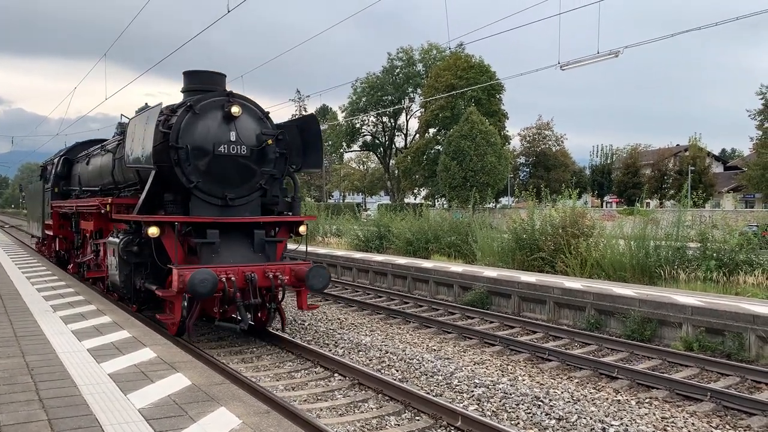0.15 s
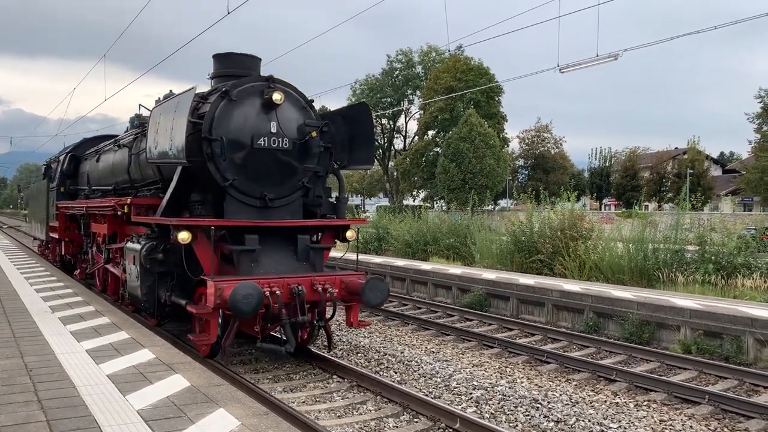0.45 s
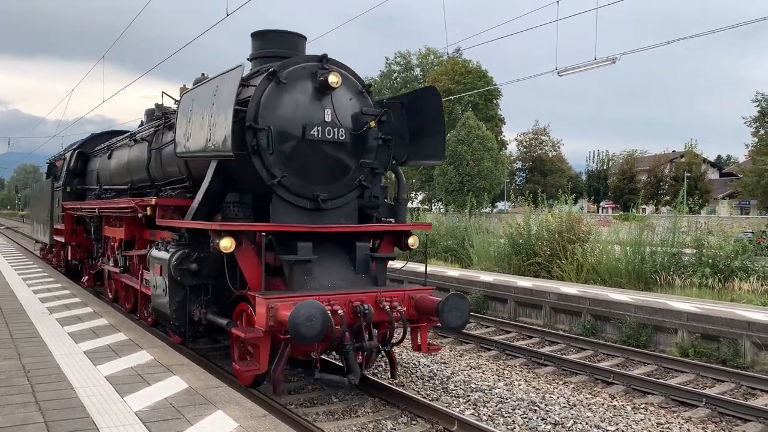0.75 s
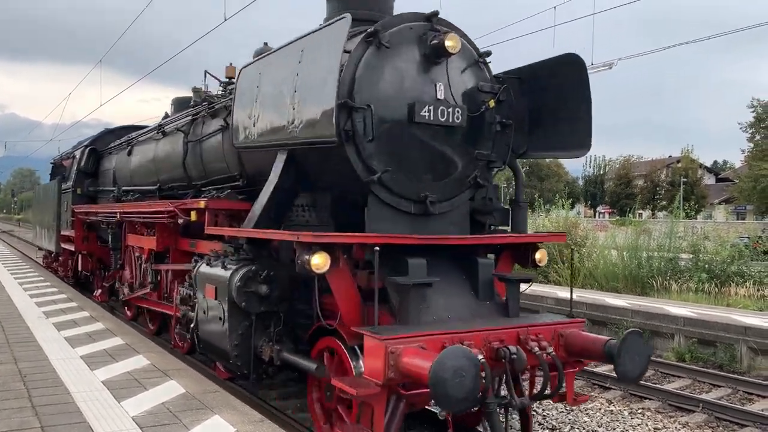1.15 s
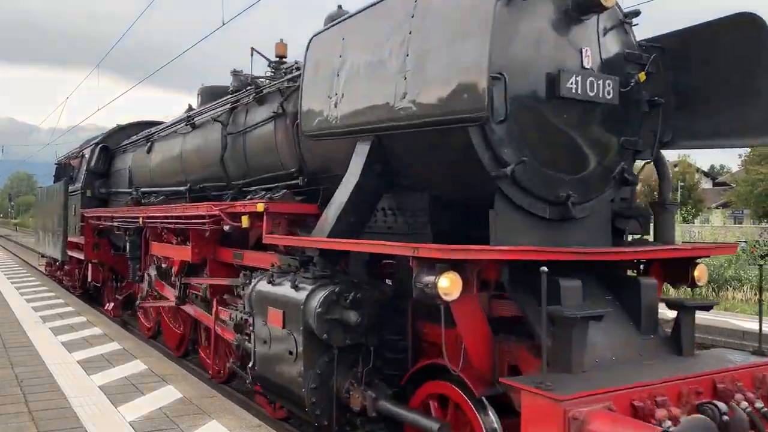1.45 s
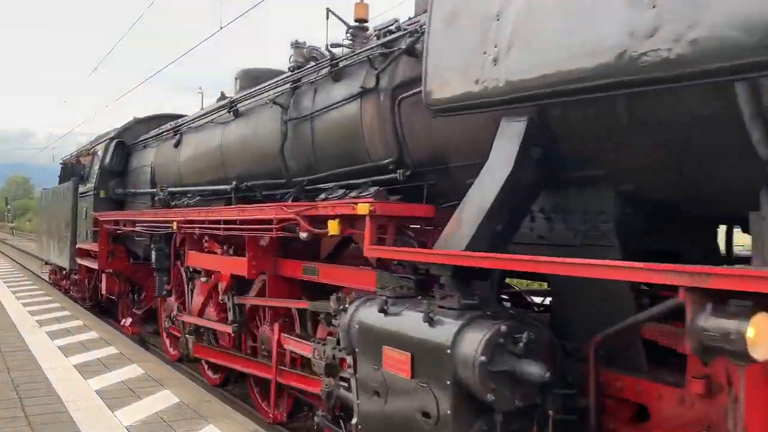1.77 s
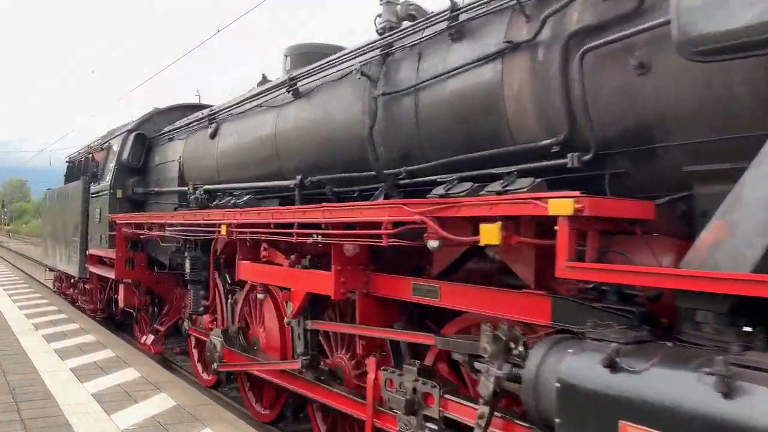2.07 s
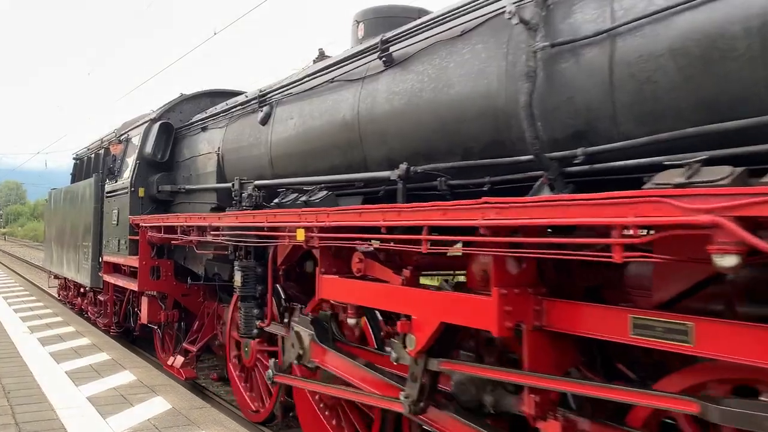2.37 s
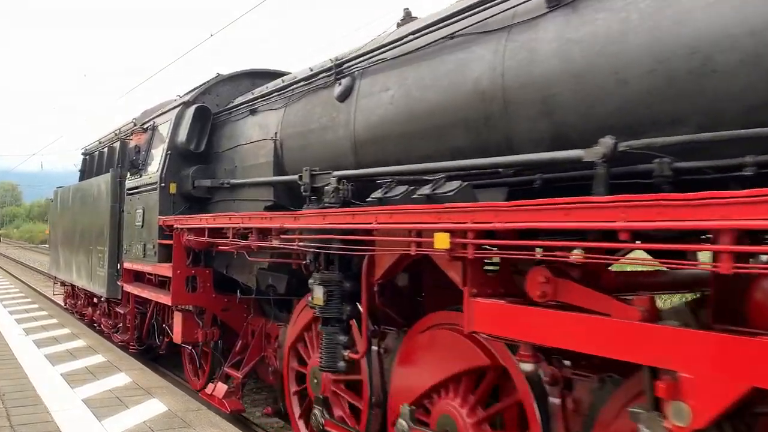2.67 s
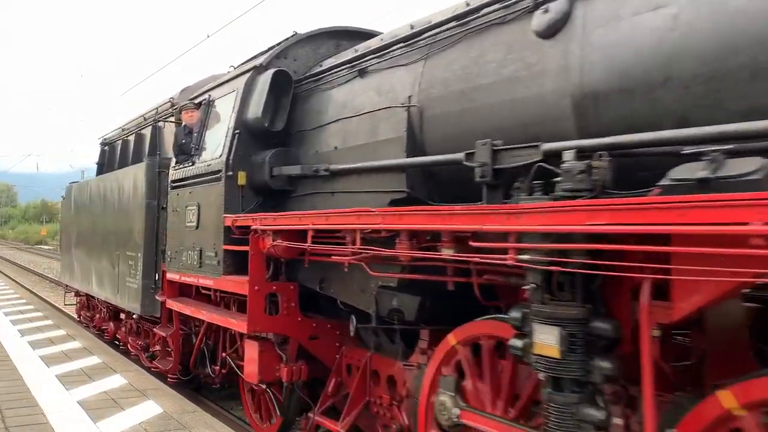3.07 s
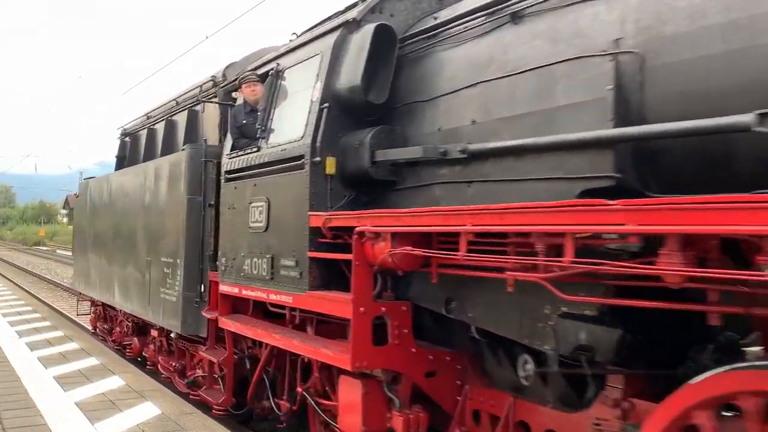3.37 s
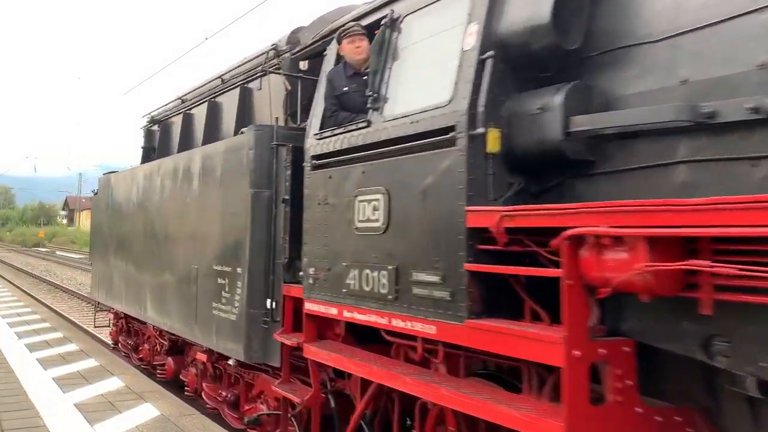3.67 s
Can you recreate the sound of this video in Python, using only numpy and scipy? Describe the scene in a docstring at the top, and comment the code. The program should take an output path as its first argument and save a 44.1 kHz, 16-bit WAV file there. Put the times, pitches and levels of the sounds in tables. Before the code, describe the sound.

A coasting steam locomotive approaches and rolls past close stereo microphones on an open station platform; bass boom peaks midway, steel clanks and rattles sharpen, then the boom fades while wheel ring and steam rush continue.

```python
"""A deep rumble and a hollow boom swell as a steam locomotive coasts past a station platform.
Bulk, rolling roar and steam are shaped noise; low throbs are short sine swells in the bass.
The coupling rods knock with a chattering crack, a short body and a ring of decaying steel modes.
Dull clanks, random rattles and small pitched clinks come from the running gear and loose fittings.
Two close microphones hear it with moving time lags and with sound scattered to both sides."""
import sys
import numpy as np
from scipy import signal
from scipy.fft import rfft, irfft, next_fast_len
from scipy.io import wavfile
from scipy.ndimage import uniform_filter1d, map_coordinates

SR = 44100
rng = np.random.default_rng(int(sys.argv[2]) if len(sys.argv) > 2 else 0)


def log_audio(samples):
    """Write samples as a 16-bit WAV file to the path given in sys.argv[1]."""
    # one column per channel
    frames = np.atleast_2d(samples).T
    # limit to full scale, then quantise
    limited = np.clip(frames, -1, 1)
    pcm = np.round(limited * 32767).astype(np.int16)
    wavfile.write(sys.argv[1], SR, pcm)


N = 168462  # samples, about 3.82 s

# Loudness of the bulk: deep rumble, thrum above it, hollow boom and frame drone.
# Each row: time in seconds, level in dB.
RUMBLE_LEVEL = [(0, -34), (.7, -31.5), (1.05, -22), (1.35, -29.5), (1.9, -25), (2.3, -24.5), (2.9, -26.5),
                (3.3, -27.5), (3.82, -29)]
THRUM_LEVEL = [(0, -22.5), (.4, -23.5), (1.1, -26), (1.6, -25.5), (1.9, -20.5), (2.2, -19.5), (2.8, -27),
               (3.82, -29)]
BOOM_LEVEL = [(0, -31.5), (.3, -27), (.7, -31), (1.05, -26.5), (1.35, -20), (1.65, -17), (2.12, -15),
              (2.45, -19.5), (2.72, -16.5), (3.05, -22.5), (3.82, -31)]
DRONE_LEVEL = [(0, -35), (.25, -28.5), (1.1, -27.5), (1.9, -24.5), (2.45, -24.5), (2.8, -23.5), (3.1, -25),
               (3.4, -28.5), (3.82, -26.5)]
# Loudness of the narrow hum. Each row: time in seconds, level in dB before a fixed trim.
HUM_LEVEL = [(0, -34.5), (.55, -34.5), (1.0, -31.5), (1.9, -38.5), (2.4, -22.5), (2.7, -38), (2.95, -26),
             (3.2, -40.5), (3.82, -36.5)]
# Tone of the bulk layers. Each row: frequency in Hz, relative density in dB per Hz.
RUMBLE_SPECTRUM = [(15, -55), (24, -30), (32, -18), (42, -4), (54, 2.5), (64, 7.5), (78, 3), (100, 1),
                   (150, -38)]
THRUM_SPECTRUM = [(25, -65), (50, -17), (72, -9), (92, 1), (115, 0.5), (135, -1.5), (160, -14.5),
                  (220, -31), (500, -64)]
BOOM_SPECTRUM = [(40, -65), (100, -22), (125, -9.5), (142, -0.5), (160, 1), (178, -2), (200, -9),
                 (260, -20.5), (400, -78), (800, -75)]
DRONE_SPECTRUM = [(40, -60), (150, -16), (205, -0.5), (240, 0), (275, 2), (305, -2.5), (345, -3.5),
                  (410, -11.5), (480, -37), (600, -29), (1500, -75)]
# The boom bends as the cylinders go by; only the ratio to the mean pitch counts.
# Each row: time in seconds, pitch in Hz.
BOOM_PITCH = [(0, 152), (1.6, 160), (2.0, 145), (2.3, 140), (2.65, 155), (3.82, 160)]
HUM_HZ, HUM_HALF_WIDTH_HZ = 222.7, 6.1
# Heavy throbs of the engine's mass. Each row: time of the crest in seconds, level in dB, pitch in Hz.
THROBS = [(0.055, -22, 138), (.101, -21.5, 86), (.302, -18, 105), (.533, -22.5, 144), (.646, -21, 118),
          (1.088, -16.5, 121), (1.19, -17, 81), (1.291, -15, 156), (1.533, -12.5, 149), (1.663, -13, 165),
          (1.877, -18, 227), (1.987, -24, 85), (2.194, -13, 146.6), (2.318, -15, 131), (2.5, -15.5, 145),
          (2.611, -16.5, 155), (2.943, -17.5, 73), (3.071, -17, 148), (3.196, -24, 156), (3.371, -23, 253),
          (3.565, -23.5, 160)]
THROB_RISE_S, THROB_FALL_S = 0.011, 0.016  # Gaussian spreads

# Rolling roar, which also sets the rattles and clinks. Each row: time in seconds, level in dB.
ROLL_LEVEL = [(0, -30.5), (.42, -29.5), (.56, -25.5), (.7, -27.5), (.9, -29.5), (1.15, -26), (1.45, -25.5),
              (1.63, -22.5), (1.82, -26.5), (2.05, -23.5), (2.35, -25), (2.6, -22.5), (2.95, -23),
              (3.13, -27.5), (3.3, -23.5), (3.5, -26.5), (3.82, -25.5)]
# Tone of the rolling roar. Each row: frequency in Hz, relative density in dB per Hz.
ROLL_SPECTRUM = [(30, -45), (200, -6), (380, -3), (470, -7), (550, 0.5), (650, 0.5), (800, 2), (950, -2.5),
                 (1100, -6), (1400, -5), (1900, -9), (2600, -12), (4000, -14), (8000, -55)]
# Loudness of the ringing wheels. Each row: time in seconds, level in dB before its wobble.
RING_LEVEL = [(0, -64), (1.0, -49), (1.7, -42), (2.3, -30.5), (2.9, -29), (3.3, -33), (3.82, -32)]
# Resonances of the wheels. Each row: frequency in Hz, width at half amplitude in Hz, relative level in dB.
WHEEL_MODES = [(445, 70, 2), (1049, 60, 0), (651, 30, 1), (1145, 50, -1), (1590, 90, -7), (1780, 90, -3),
               (1975, 70, -4), (3102, 35, -9), (3360, 60, -12), (3575, 40, -11), (3747, 35, -9),
               (4021, 24, -4), (4650, 400, -13), (7466, 120, -10)]
RING_PATCHY_DB = 3.5
RATTLES_PER_S, RATTLE_DB = 22, -8  # dB of the loudest rattles, relative to the roll level

# Rod knocks. Each row: time in seconds, then body, crack and ring levels in dB;
# body and ring are before fixed trims.
KNOCKS = [(.065, -33, -30, -30), (1.041, -25, -19, -26), (1.493, -37, -26, -37), (1.673, -26, -34, -40),
          (2.027, -16, -17, -25), (2.476, -18.5, -20.5, -23.5), (2.544, -22.5, -26, -30),
          (2.95, -34, -23, -30), (3.0, -12.5, -10.5, -12), (3.31, -32, -31, -31), (3.609, -29, -27, -30)]
# Contacts within one knock. Each row: delay in seconds, level in dB relative to the knock.
CHATTER = [(0, 0), (.0035, -1), (.0095, -10), (.021, -15)]
# Ringing modes of the rods. Each row: frequency in Hz, relative level in dB, 60 dB decay in seconds.
STEEL_MODES = [(445, -0.5, 0.12), (563, 1, 0.12), (880, 6, 0.084), (1178, 8, 0.12), (1737, 8, .08),
               (1760, -5, .07), (1970, -1, 0.13), (2660, -9, 0.072), (3370, -6, 0.17), (4053, 3.5, 0.12),
               (5230, 2, .06), (6370, -6, .06), (7280, 7, .12)]
# Tone of the knock's body and crack. Each row: frequency in Hz, relative density in dB per Hz.
KNOCK_BODY = [(250, -18), (600, 4.5), (1100, -10.5), (1800, 11), (2600, -2.5), (4000, -8), (8000, -20),
              (12000, -55)]
KNOCK_CRACK = [(1500, -54), (3000, -6.5), (4000, 4.5), (5200, 4), (7500, 9), (9000, -2), (11000, 3),
               (12500, -14), (14000, -45)]
# Lighter, duller clanks of the gear. Each row: time in seconds, level in dB before a fixed trim.
CLANKS = [(.236, -28), (.524, -25), (.555, -22.5), (.996, -24.5), (1.046, -20.5), (1.13, -23), (1.241, -25),
          (1.467, -19.5), (1.624, -19), (2.046, -19), (2.116, -22), (2.475, -15.5), (2.548, -20),
          (3.005, -16)]
# Tone of the clanks and rattles. Each row: frequency in Hz, relative density in dB per Hz.
CLANK_BODY = [(250, -1), (550, 10), (850, 12.5), (1300, -5), (2000, -22), (3000, -14), (6000, -44),
              (11000, -36)]
ATTACK_S, BODY_T60_S, CRACK_T60_S, CLANK_T60_S = 0.001, 0.11, 0.041, 0.054
CLINK_HZ, CLINK_SPREAD_OCT, CLINK_T60_S = 1499, .6, 0.093
CLINK_DB = -3.5  # loudest clinks, relative to the roll level

# Loudness of the steam rush and the fine hiss. Each row: time in seconds, level in dB before its wobble.
STEAM_LEVEL = [(0, -36), (.6, -35), (.8, -33.5), (1.4, -31.5), (2.2, -29), (2.9, -31.5), (3.2, -30.5),
               (3.82, -30)]
HISS_LEVEL = [(0, -27.5), (.7, -25.5), (1.6, -25.5), (2.4, -24), (3.1, -27), (3.82, -26.5)]
# Tone of the steam rush and the hiss. Each row: frequency in Hz, relative density in dB per Hz.
STEAM_SPECTRUM = [(30, -45), (1000, -11), (2000, 3.5), (2700, -1.5), (3300, -6), (4000, 3.5), (4800, 5),
                  (6000, 3.5), (7000, 5.5), (8000, 2), (9000, -42), (11000, -45)]
HISS_SPECTRUM = [(4000, -66), (6000, -6.5), (7200, -5.5), (8300, 3.5), (9700, 3.5), (11500, 2.5),
                 (13500, 0.5), (15700, -4.5)]
# Drift of the steam rush. Each row: time in seconds, left minus right in dB.
STEAM_BALANCE = [(0, -3), (1.5, -3), (2.5, -3), (3.82, 0)]
HISS_LAG_MS, HISS_TURN_RAD = .2105, 1.85  # lag of the left side, constant phase between the sides

# Left-right likeness of sound scattered by the platform. Each row: frequency in Hz, coherence from 0 to 1.
ALIKE = [(60, 0.97), (200, 0.93), (350, 0.92), (600, 0.21), (1000, 0.44), (2000, 0.023), (6000, 0.022)]
# Bearing of the running gear. Each row: time in seconds, lag of the left microphone in milliseconds.
BEARING = [(0, -0.16), (.7, -0.15), (1.2, 0.045), (1.7, 0.0058), (2.15, 0.14), (2.6, 0.32), (3.1, 0.31),
           (3.82, 0.33)]
TOP_HZ = 15850


def bulk():
    """Boiler, frame and track bed: noise bands for rumble, thrum, boom, drone and a narrow hum."""
    rumble = amp(curve(RUMBLE_LEVEL)) * scattered(RUMBLE_SPECTRUM) * amp([[.8], [-.8]])
    thrum = amp(curve(THRUM_LEVEL)) * scattered(THRUM_SPECTRUM) * amp([[.6], [-.6]])
    boom = amp(curve(BOOM_LEVEL)) * booming()
    drone = amp(curve(DRONE_LEVEL)) * scattered(DRONE_SPECTRUM, patchy_db=2.5)
    resonance = lambda hz: 1 / (1 + ((hz - HUM_HZ) / HUM_HALF_WIDTH_HZ) ** 4)
    band = unit(filtered(rng.standard_normal(N), resonance))
    hum = amp(curve(HUM_LEVEL) + 2.5) * passing(band)
    return rumble + thrum + boom + drone + hum


def booming():
    """A dense, evened-out roar of rms 1, its pitch bent by a varying playback speed."""
    roar = signal.hilbert(scattered(BOOM_SPECTRUM), next_fast_len(N))[:, :N]
    envelope = np.abs(roar).mean(axis=0)
    even = roar.real / np.sqrt(envelope + .5)
    pitch = curve(BOOM_PITCH)
    position = np.cumsum(pitch / pitch.mean())
    return unit(np.array([np.interp(position, np.arange(N), side) for side in even]))


def throbs():
    """Short sine swells in the bass as the weight bears on the track."""
    t = np.arange(-SR // 8, SR // 8) / SR
    out = np.zeros(N + SR)
    spread = np.where(t < 0, THROB_RISE_S, THROB_FALL_S)
    swell = np.exp(-.5 * (t / spread) ** 2)
    for crest, db, hz in THROBS:
        tone = np.sin(2 * np.pi * (hz * t + rng.random()))
        out[round(crest * SR):][:len(t)] += np.sqrt(2) * amp(db) * swell * tone
    return passing(out[len(t) // 2:][:N])  # puts the crests at their listed times


def wheels():
    """Rolling roar, direct and scattered, with ringing wheel discs and loose parts rattling at random."""
    unevenness_db = .6 * wobble(30)
    roar = amp(-6) * passing(noise(ROLL_SPECTRUM)) + amp(-7.0) * scattered(ROLL_SPECTRUM, patchy_db=4.0)
    rolling = amp(curve(ROLL_LEVEL)) * (amp(unevenness_db) * roar + rattling())
    return wheel_ring() + rolling


def rattling():
    """Noise bursts of loose parts at jittered times and random strengths."""
    chance = rng.random((300, 3))
    times = (np.arange(len(chance)) + 2 * chance[:, 0]) / RATTLES_PER_S
    heard = times < N / SR
    levels_db = RATTLE_DB - 12 * chance[heard, 1]
    return blows(times[heard], levels_db, t60=0.083) * passing(noise(CLANK_BODY))


def wheel_ring():
    """Wheel discs ringing as they roll: patchy noise through a bank of resonances."""
    discs = lambda hz: sum(amp(db) / (1 + ((hz - c) / (w / 2)) ** 2) for c, w, db in WHEEL_MODES)
    excitation = np.vstack([patchy(RING_PATCHY_DB)[0], patchy(RING_PATCHY_DB)])
    rung = filtered(excitation, discs)
    direct, around = passing(rung[0]), rung[1:]
    return amp(curve(RING_LEVEL) + 1.2 * wobble(6.26)) * unit(direct + amp(0.5) * around)


def rods():
    """Play in the rod bearings: each knock is a chattering crack, a short body and a ring of steel."""
    times, body_db, crack_db, ring_db = np.transpose(KNOCKS)
    thud = unit(passing(noise(KNOCK_BODY)) + amp(6.5) * scattered(KNOCK_BODY))
    body = chattering(times, body_db - 4.0, BODY_T60_S) * thud
    snap = scattered(KNOCK_CRACK, patchy_db=5) * amp([[-.8], [.8]])
    crack = chattering(times, crack_db, CRACK_T60_S) * snap
    return body + crack + passing(steel_ring(times, ring_db))


def steel_ring(times, levels_db):
    """Struck steel as decaying sine modes, slightly rebalanced at each knock."""
    ring = np.zeros(N + SR)
    t = np.arange(SR // 3) / SR
    attack = 1 - np.exp(-t / ATTACK_S)
    for s, level_db in zip(times, levels_db):
        modes = np.zeros(len(t))
        for hz, db, t60 in STEEL_MODES:
            decay = amp(db + rng.normal(0, 0.88) - 60 * t / t60)
            modes += decay * np.sin(2 * np.pi * (hz * t + rng.random()))
        ring[round(s * SR):][:len(t)] += amp(level_db - 9.5) * modes * attack
    return ring[:N]


def gear():
    """Dull, short clanks of links and wheels: noise bursts, direct and scattered."""
    times, db = np.transpose(CLANKS)
    clank = unit(passing(noise(CLANK_BODY)) + amp(-3.5) * scattered(CLANK_BODY))
    return blows(times, db + 2.0, CLANK_T60_S) * clank


def clinks(count=170):
    """Loose fittings ring briefly at random, each at its own pitch, louder as the wheels roar."""
    t = np.arange(SR // 8) / SR
    out = np.zeros((2, N + SR))
    fade = amp(-60 * t / CLINK_T60_S) * (1 - np.exp(-t / ATTACK_S))
    for (when, size, *phase), octave in zip(rng.random((count, 4)), rng.standard_normal(count)):
        hz = CLINK_HZ * 2 ** (CLINK_SPREAD_OCT * octave)
        tone = np.sin(2 * np.pi * np.add.outer(phase, hz * t))  # separate phase on each side
        out[:, int(when * N):][:, :len(t)] += amp(CLINK_DB - 10 * size) * fade * tone
    return amp(curve(ROLL_LEVEL)) * out[:, :N]


def steam():
    """Steam as a broad noise rush and a fine hiss that reaches the two microphones out of step."""
    sides = amp(np.outer([.5, -.5], curve(STEAM_BALANCE)))
    rush_level = amp(curve(STEAM_LEVEL) + 0.81 * wobble(14))
    rush = sides * rush_level * scattered(STEAM_SPECTRUM, patchy_db=.8)
    lead = lambda hz: np.pi * hz * HISS_LAG_MS / 1000 - HISS_TURN_RAD / 2  # half the phase gap
    jet = filtered(noise(HISS_SPECTRUM), lambda hz: np.exp(1j * np.outer([-1, 1], lead(hz))))
    return rush + amp(curve(HISS_LEVEL) + 0.32 * wobble(14)) * jet


def passing(x):
    """A mono source heard from the moving bearing of the running gear, as a lag between the sides."""
    half = curve(BEARING) * SR / 2000  # half the lag, in samples
    return np.array([map_coordinates(x, [np.arange(N) + sign * half], order=3) for sign in (-1, 1)])


def scattered(spectrum, patchy_db=0):
    """Stereo noise of rms 1 from all sides: a mid and side mix sets the coherence per frequency."""
    turn = lambda hz: np.arccos(np.clip(along(ALIKE, hz), -1, 1)) / 2
    shape = lambda hz: amp(along(spectrum, hz)) * [np.cos(turn(hz)), np.sin(turn(hz))]
    mid, side = filtered(patchy(patchy_db), shape)
    return unit(np.array([mid + side, mid - side]))


def patchy(patchy_db):
    """Two white noises sharing patches of random gain in time and frequency."""
    z = signal.stft(rng.standard_normal((2, N)), nperseg=1024)[2]
    field = rng.standard_normal(z.shape[1:])
    field = uniform_filter1d(field, size=4, axis=0)  # across frequency
    field = uniform_filter1d(field, size=10, axis=1)  # across time
    return signal.istft(z * amp(patchy_db * unit(field)), nperseg=1024)[1][:, :N]


def noise(spectrum):
    """Mono noise of rms 1 with the given spectrum."""
    return unit(filtered(rng.standard_normal(N), lambda hz: amp(along(spectrum, hz))))


def chattering(times, db, t60):
    """Envelope of knocks that each make a few quick contacts."""
    delay, relative_db = np.transpose(CHATTER)
    contacts = np.add.outer(times, delay).ravel()
    return blows(contacts, np.add.outer(db, relative_db).ravel(), t60)


def blows(times, levels_db, t60):
    """Envelope of blows with quick attack and exponential decay; overlaps add in power."""
    t = np.arange(SR // 3) / SR
    shape = (1 - np.exp(-t / ATTACK_S)) * amp(-60 * t / t60)
    power = np.zeros(N + SR)
    for s, db in zip(times, levels_db):
        power[max(0, round(s * SR)):][:len(t)] += (amp(db) * shape) ** 2
    return np.sqrt(power[:N])


def filtered(x, response):
    """Filter x by a real or complex response of frequency."""
    m = next_fast_len(N + 8192)
    return irfft(rfft(x, m) * response(np.fft.rfftfreq(m, 1 / SR)), m)[..., :N]


def wobble(rate):
    """A smooth random curve with rate knots a second."""
    return map_coordinates(rng.standard_normal(2000), [np.arange(N) * rate / SR], mode="wrap")


def curve(rows):
    """One value per sample, in straight lines between (seconds, value) rows."""
    return np.interp(np.arange(N) / SR, *np.transpose(rows))


def along(points, hz):
    """Interpolate (Hz, value) points on a log frequency axis."""
    f, v = np.transpose(points)
    return np.interp(np.log(hz + 1), np.log(f + 1), v)


def unit(x):
    """Scale to rms 1."""
    return x / np.sqrt(np.mean(x ** 2) + 1e-20)


def amp(db):
    """Decibels to amplitude."""
    return 10 ** (np.asarray(db) / 20)


def scene():
    """The passing engine: bulk, throbs, wheels, rods, gear and clinks over the steam."""
    return bulk() + throbs() + wheels() + rods() + gear() + clinks() + steam()


def record(dry):
    """Soft saturation rounds off the highest peaks; then all above the band limit is removed."""
    rounded = dry / (1 + np.abs(dry / .95) ** 8) ** (1 / 8)
    return filtered(rounded, lambda hz: hz < TOP_HZ)


dry = scene()
out = record(dry)
log_audio(out)
```